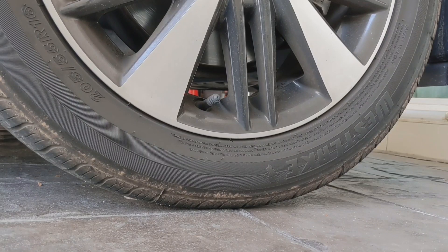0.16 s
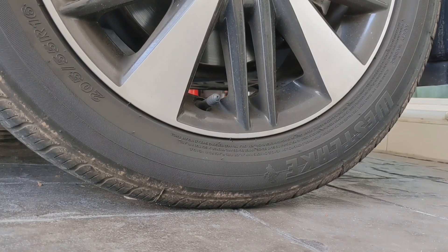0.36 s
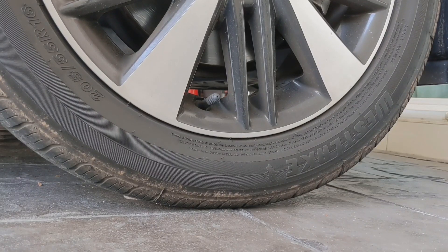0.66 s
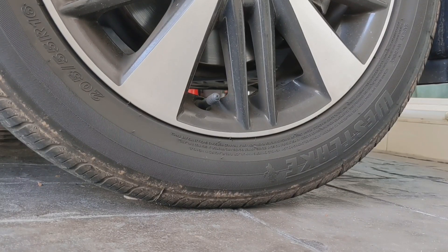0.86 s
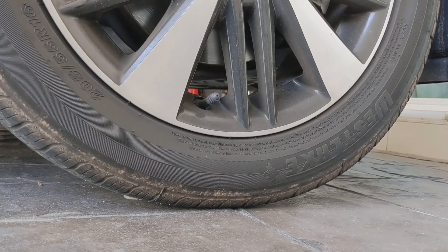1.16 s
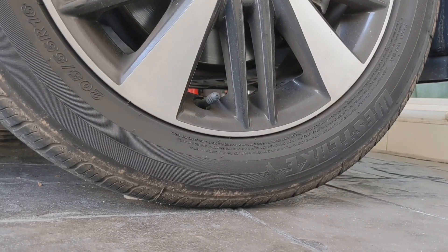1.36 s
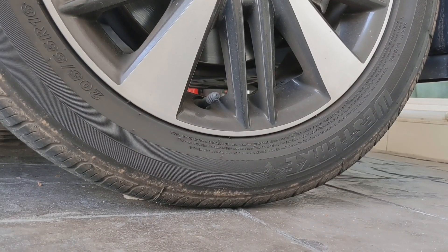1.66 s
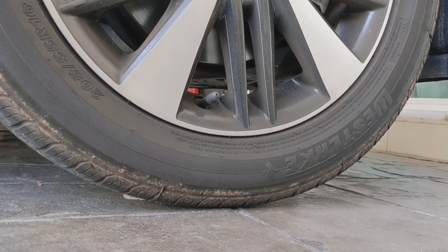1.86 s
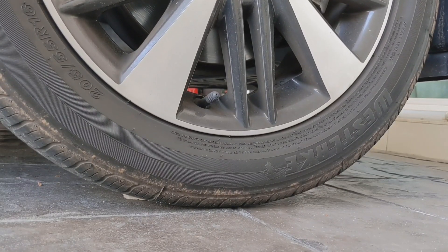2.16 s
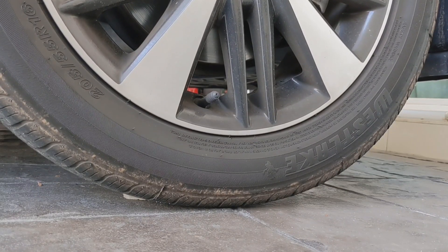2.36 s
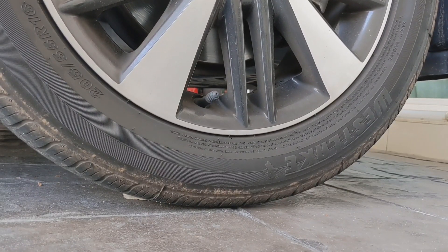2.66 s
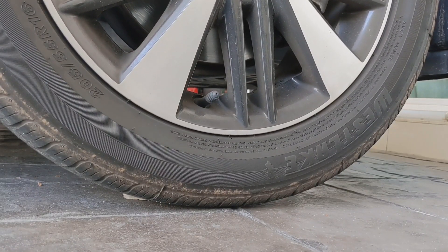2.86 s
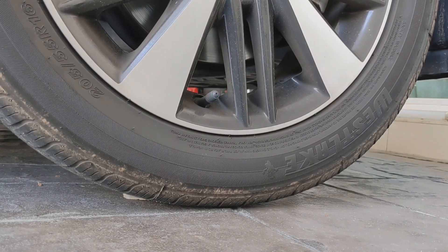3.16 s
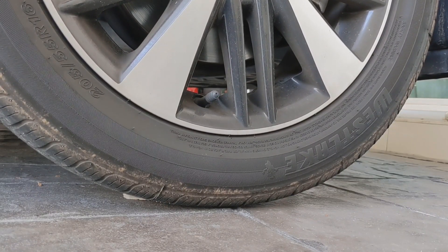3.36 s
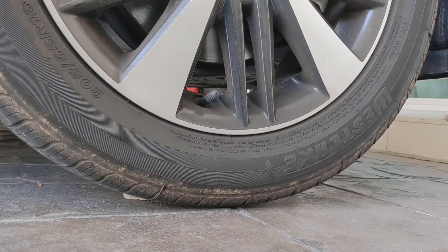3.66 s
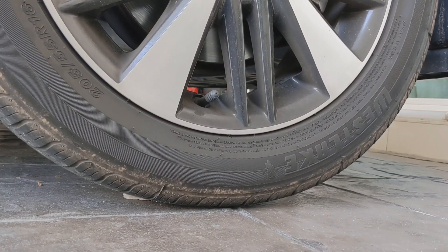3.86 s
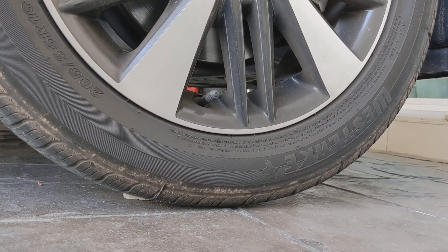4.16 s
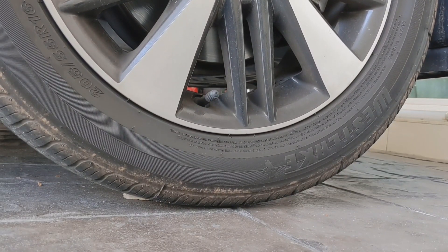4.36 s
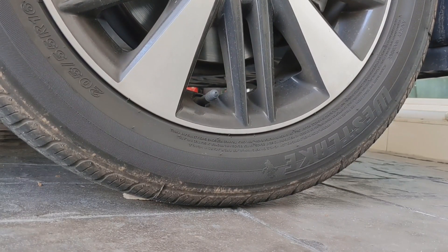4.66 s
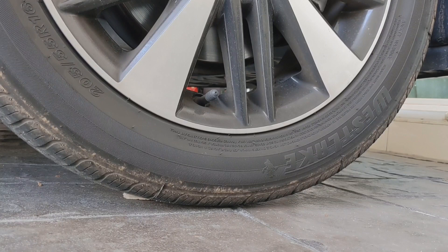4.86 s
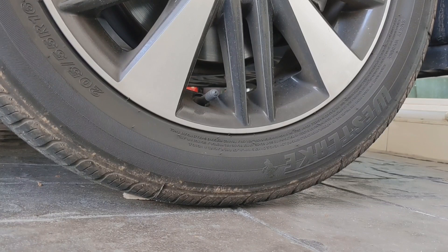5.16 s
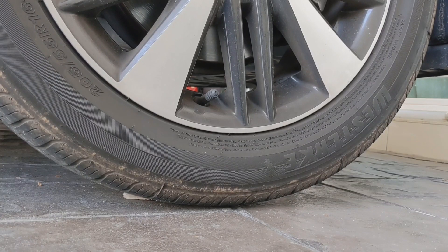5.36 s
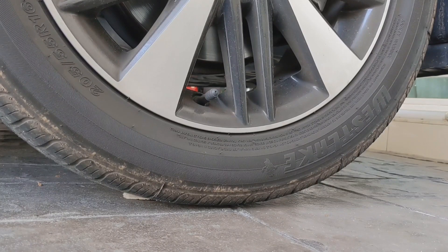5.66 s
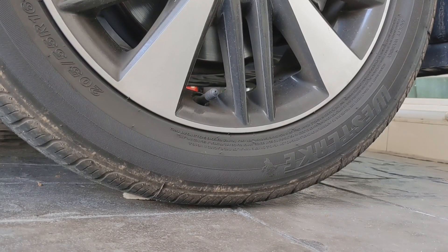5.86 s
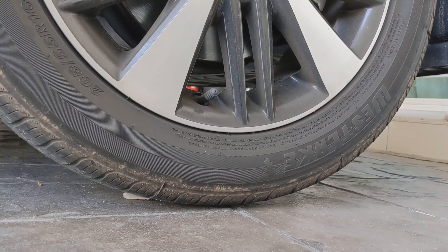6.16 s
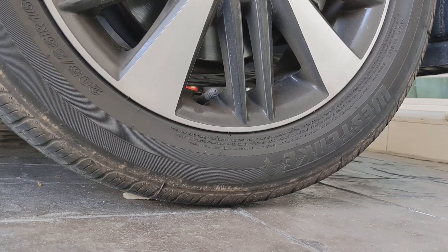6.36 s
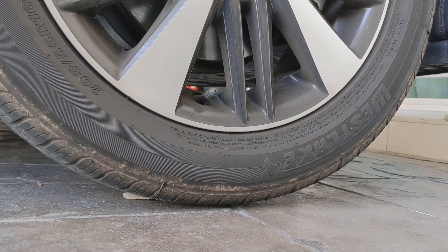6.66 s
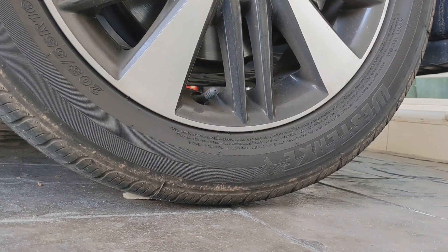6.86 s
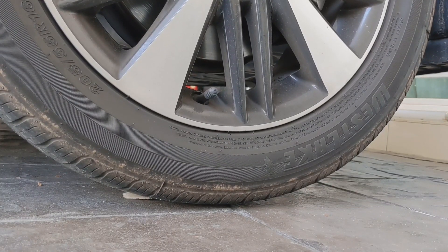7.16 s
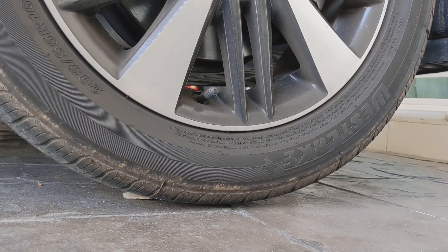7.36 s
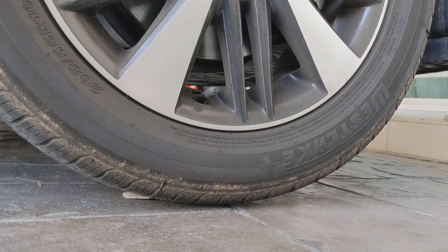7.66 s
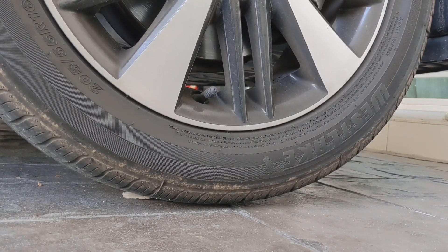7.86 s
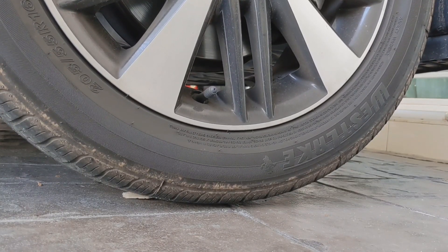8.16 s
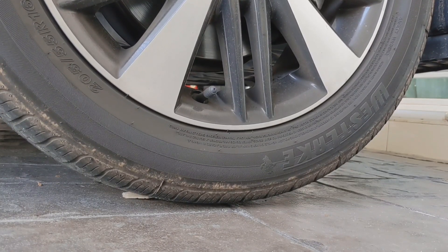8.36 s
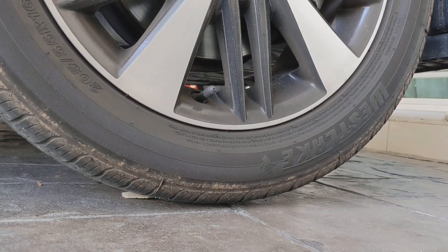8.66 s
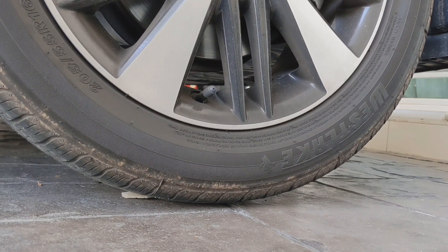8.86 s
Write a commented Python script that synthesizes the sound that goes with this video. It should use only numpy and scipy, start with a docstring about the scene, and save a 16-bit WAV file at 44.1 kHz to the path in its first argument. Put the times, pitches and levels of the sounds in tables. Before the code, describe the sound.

A hooked rod knocks unevenly in a scissor jack under a car, dry steel clacks and low shudders over soft rumble, slightly to the right.

```python
"""Outdoors on paving, close to a car: a scissor jack under it is cranked by hand with a hooked rod.
The hook knocks in the screw's eye, the loose rod clanks, the loaded body thumps: rattling noise forces drive
damped modes and noise bands. A sine groans; shaped noise makes sleeve, background rumble, mid-range wash, hiss
and a late puff of wind. The jack is to the right of a two-port microphone on a camera: the left port hears it
later and duller."""
import sys
import numpy as np
from scipy import signal
from scipy.fft import rfft, irfft, next_fast_len
from scipy.io import wavfile
from scipy.ndimage import uniform_filter1d, map_coordinates

SR = 44100
rng = np.random.default_rng(int(sys.argv[2]) if len(sys.argv) > 2 else 0)


def master(y):
    """Save y as 16-bit WAV."""
    cut = np.clip(np.atleast_2d(y).T, -1, 1)
    pcm = np.round(cut * 32767)  # scale
    wavfile.write(sys.argv[1], SR, pcm.astype(np.int16))


N = 396900

# Background rumble and mid-range wash, swelling with the after-shake of jack and car around some knocks:
# (time [s], rumble level [dB], mid-range level [dB])
BACKGROUND_LEVELS = [(0.0, -36.5, -34), (.3, -37.5, -47), (.95, -39, -38), (1.1, -41.5, -43.5),
                     (2.01, -37.5, -42), (2.8, -44, -45), (3.4, -44.5, -51), (3.99, -47.5, -47),
                     (4.26, -40.5, -45.5), (4.76, -41, -42.5), (5.1, -44.5, -49), (5.5, -42, -45.5),
                     (5.97, -41, -41.5), (6.2, -44, -48), (7.1, -43, -48), (7.84, -44.5, -47.5),
                     (8.57, -42.5, -48.5), (9.0, -42, -46.5)]
# Background rumble spectrum: (frequency [Hz], relative level [dB])
RUMBLE_SPECTRUM = [(15, -32), (25, -22), (59, -1), (81, 3), (168, -15), (250, -19.5), (320, -50),
                   (550, -120)]
# Mid-range wash spectrum: (frequency [Hz], relative level [dB])
MIDRANGE_SPECTRUM = [(88, -19), (150, 4), (303, -5.5), (350, -3.5), (770, -13), (1140, -22), (1840, -37.5),
                     (2600, -48), (3380, -55.5), (5720, -120)]
# Hiss spectrum: (frequency [Hz], relative level [dB])
HISS_SPECTRUM = [(880, -14), (1500, 5.5), (2060, 0), (3770, -7), (7840, -10.5), (15100, -16.5),
                 (16000, -21)]
# How alike spread-out noise arrives left and right: (frequency [Hz], correlation [-1 to 1])
PORT_LIKENESS = [(60, 1), (200, 0.89), (400, 0.85), (600, 0.06), (1000, 0.25), (1800, 0.045),
                 (15000, 0.037)]
# Wind buffeting spectrum: (frequency [Hz], relative level [dB])
BUFFET_SPECTRUM = [(20, -30), (60, -0.5), (100, 0.5), (150, -7), (300, -24), (600, -69.5)]
# Cloth swishing as the arm turns: (middle [s], level [dB], half length to 1/e [s])
SLEEVE_SWISHES = [(0.005, -39.5, 0.045), (0.116, -56, 0.058), (0.616, -48.5, 0.035), (1.042, -47.5, 0.035),
                  (1.303, -54.5, 0.08), (1.449, -48, 0.023), (1.76, -57, 0.056), (3.084, -46, 0.025),
                  (3.738, -52.5, 0.018), (4.17, -58, 0.044), (4.256, -54, 0.07), (4.97, -56.5, 0.044),
                  (5.53, -52.5, 0.028), (6.522, -60, 0.03), (6.677, -59, 0.065), (7.032, -56.5, 0.038),
                  (7.184, -56.5, 0.04), (7.697, -56.5, 0.04)]
# Cloth friction spectrum: (frequency [Hz], relative level [dB])
CLOTH_SPECTRUM = [(900, -12), (2000, -1), (4000, -1.5), (8000, -3.5), (13000, -10.5), (16000, -13)]

# Small dry ticks: (time [s], level [dB])
TICK_EVENTS = [(1.5528, -27.5), (1.8813, -44), (3.5237, -51), (3.8711, -55), (4.481, -36), (5.25, -49),
               (6.6238, -50.5), (8.2526, -46), (8.96, -45.5)]
# The car body settling on the jack; the first three rows (1.625, 1.845, 2.114 s) are the hook leaning in just
# before a knock: # (time [s], body [dB], arms and frame [dB], grit [dB], chatter decay [s], bloom scale [s])
THUMP_EVENTS = [(1.625, -35, -33, -34, 0.015, .01), (1.845, -30, -30, -47, 0.074, 0.015),
                (2.114, -32, -33.5, -42.5, 0.019, .018), (2.684, -31, -45, -60, 0.024, 0.0054),
                (3.102, -29.5, -39, -47.5, 0.058, .003), (4.111, -31, -38, -46.5, 0.077, .003),
                (4.269, -44, -47, -55.5, 0.044, .005), (5.425, -30, -41, -47, 0.061, .004),
                (6.538, -38, -47, -67, 0.066, .004), (6.884, -32, -40, -49, 0.028, 0.0045),
                (7.08, -34.5, -42, -55, 0.061, .006), (7.607, -29.5, -39, -44, 0.058, .003),
                (8.128, -28.5, -36.5, -42.5, 0.051, .003), (8.681, -24.5, -38.5, -43, 0.057, 0.0027)]
# Loose rod clanking: (time [s], shrill modes [dB], first mode [dB], second mode [dB],
# middle modes [dB], high modes [dB], crack [dB], bloom scale [s])
CLANK_EVENTS = [(2.837, -16, -17, -16.5, -28.5, -20.5, -14.5, 0.0038),
                (7.9636, -18.5, -21, -14, -21.5, -39, -23.5, 0.006),
                (8.5167, -20.5, -24.5, -27.5, -30, -21, -28, 0.0082)]
# Hook knocking the jack: (time [s], crack [dB], crack tilt [dB per octave], frame [dB], arms [dB],
# arms tilt [dB per octave], screw [dB], eye [dB], chatter scale [s])
KNOCK_EVENTS = [(0.2957, -19, -6, -19.5, -34, -1.5, -19.5, -20, 0.013),
                (0.4648, -14, -0.5, -21, -25, -0.5, -53, -24, .009),
                (0.7878, -14.5, -5.5, -20, -19, 4.5, -20.5, -20.5, .012),
                (0.9185, -18.5, -5, -46, -16.5, -6, -29.5, -32, .011),
                (0.9755, -21.5, -3.5, -18, -30, -2, -19.5, -24, 0.0099),
                (1.2486, -43.5, -19, -24.5, -22.5, 2.5, -23, -35.5, 0.013),
                (1.375, -26.5, -7, -15, -28, 8, -27.5, -24.5, 0.0064),
                (1.6464, -20.5, -7, -23, -23, -3.5, -24, -26, 0.012),
                (1.9078, -15.5, -3, -20.5, -23.5, -2, -45, -52.5, 0.011),
                (2.1318, -24, -7, -20, -22.5, -4.5, -29.5, -26, 0.013),
                (2.388, -8.5, 1.5, -20.5, -27, -1, -19, -36, 0.015),
                (3.6167, -26, -5.5, -21.5, -27.5, -3.5, -35.5, -42, .0086),
                (3.6834, -42, -3, -26.5, -22, -2.5, -26, -36.5, 0.015),
                (3.9395, -56, -16, -33.5, -30, 0.5, -39, -62, 0.015),
                (4.5475, -14, -6.5, -16.5, -11, -9.5, -28, -26, 0.011),
                (4.767, -24.5, -4.5, -20.5, -10.5, -9, -46, -39.5, .0065),
                (5.1804, -27.5, -9.5, -15.5, -16.5, -26, -22.5, -16.5, 0.015),
                (5.319, -21.5, -6.5, -21, -15, -10, -31.5, -35, 0.009),
                (5.765, -45, 1, -20.5, -15, -3, -27.5, -24, 0.014),
                (5.892, -15, -4, -21, -19, -2.5, -16, -28.5, 0.012),
                (6.3616, -26, -3.5, -17, -15, -3.5, -49.5, -32, .0084),
                (7.3937, -47, -6, -24, -38.5, -1, -56.5, -46, 0.012)]

# Car body, damped modes: (frequency [Hz], width [Hz], relative strength [dB])
BODY_MODES = [(119, 87, -4.5), (157.6, 8.4, 9.5), (179.9, 6.5, -1.5), (243, 38, -1)]
# Jack frame: (frequency [Hz], width [Hz], relative strength [dB])
FRAME_MODES = [(299, 33, -14), (363.6, 25.3, -2.5), (396.2, 76, -3), (434, 68, 2)]
# Jack arms: (frequency [Hz], width [Hz], relative strength [dB])
ARM_MODES = [(475, 56, -3), (567.4, 105.6, -5), (660, 102, -4), (698.6, 75, -3), (802, 67, -7.5)]
# Jack screw: (frequency [Hz], width [Hz], relative strength [dB])
SCREW_MODES = [(1050, 87, -2), (1360, 280, 5.5), (1810, 167, 5.5), (1892, 236, 5), (2550, 520, -7.5),
               (2863, 310, 2.5), (3240, 310, -14)]
# Jack pins: (frequency [Hz], width [Hz], relative strength [dB])
PIN_MODES = [(2720, 91, 9.5), (3240, 200, 0), (3970, 34, -4), (4920, 43, 8), (5400, 490, 2), (6320, 120, 8),
             (7630, 200, -4), (9160, 110, -9), (10340, 230, -26)]
# Rod, first bending mode as a close pair: (frequency [Hz], width [Hz], relative strength [dB])
ROD_FIRST_MODES = [(343, 46, 2.9), (421, 77, 0.5)]
# Rod, second bending mode as a close pair: (frequency [Hz], width [Hz], relative strength [dB])
ROD_SECOND_MODES = [(713, 103, 0), (794, 45, 9)]
# Rod, middle modes: (frequency [Hz], width [Hz], relative strength [dB])
ROD_MIDDLE_MODES = [(1040, 46, 5.5), (1440, 170, -3), (1820, 45, 5), (1893, 45, 8), (2410, 360, -10.5),
                    (2820, 150, -3.5), (3166, 490, -8)]
# Rod, high modes: (frequency [Hz], width [Hz], relative strength [dB])
ROD_HIGH_MODES = [(2920, 97, -5), (4460, 200, -6), (4350, 260, 0.5), (5400, 160, -7.5), (5740, 440, 5),
                  (6220, 160, -3.5), (7160, 170, -10.5)]
# Rod, shrill modes: (frequency [Hz], width [Hz], relative strength [dB])
ROD_SHRILL_MODES = [(7800, 200, -5), (9380, 580, -0.5), (10700, 550, -8), (12850, 920, -6.5),
                    (13460, 400, -23), (15400, 330, -11)]

# Crack of steel on steel: (frequency [Hz], relative level [dB])
CRACK_SPECTRUM = [(600, -15), (1200, -6), (2000, -8), (3000, 4), (5000, -4.5), (7000, -3.5), (10000, -4),
                  (14000, -14), (17000, -12)]
# Small dry contact: (frequency [Hz], relative level [dB])
TICK_SPECTRUM = [(1500, -40), (2600, 6.5), (4000, 0), (8000, -4), (16000, -22)]
# Grinding grit: (frequency [Hz], relative level [dB])
GRIT_SPECTRUM = [(500, -11), (900, 8.5), (1500, 1.5), (2500, -3), (5000, -15.5), (10000, -30), (16000, -31)]
# Reverberation between paving and floor pan: (frequency [Hz], decay by 60 dB [s])
UNDERSIDE_DECAY = [(100, 0.21), (300, 0.33), (700, 0.27), (2000, 0.33), (5000, 0.27), (13000, 0.21)]
# Farther port, shaded by the camera: (frequency [Hz], gain [dB])
LEFT_PORT_GAIN = [(60, -2), (300, -1), (700, -1), (2500, -3), (4500, -6.5), (6500, -4.5), (10000, -13.5),
                  (15000, -7.5)]
# The bass bends round the camera and lags less: (frequency [Hz], phase lead [radians])
LEFT_PORT_LEAD = [(60, 0.12), (200, 0.64), (350, 1), (600, 0.32), (900, .01), (16000, .01)]

HISS_DB, HISS_PER_DB = -58.5, 1  # mean hiss, and how it follows the mid-range
PUFF_S, PUFF_RISE_S, PUFF_HOLD_S, PUFF_FALL_S, PUFF_DB = 8.70, 0.046, 0.071, 0.03, -24
RUSTLE_DB, RUSTLE_SWING_DB = -65, 3.5  # faint cloth movement between the swishes
GROAN_S, GROAN_LENGTH_S, GROAN_DB, GROAN_SAG_DB_PER_S = 4.335, 0.19, -38.5, -49
CLANK_CHATTER_S, KNOCK_BLOOM_S = 0.01, 0.0037  # scales, stretched or shortened for each part
EYE_HZ, EYE_WIDTH_HZ, EYE_SAG_HZ_PER_S = 2223, 100, 20  # the screw's eye rings lower as the jack opens
BODY_SHARE_DB = -7  # the car body takes this much of what shakes the frame
AFTER_DB, AFTER_PER_DB = -7, 0.51  # after-shake of a 0 dB crack, and how it grows with the crack
LEFT_LAG_S = 20 / 44100
TOP_HZ = 15900
SPAN = SR // 3  # samples kept for each blow


def amp(db):
    """Decibels to amplitude."""
    return 10 ** (np.asarray(db) / 20)


def unit(x):
    """Scales to an rms of 1."""
    return x / np.sqrt(np.mean(np.abs(x) ** 2) + 1e-20)


def along(points, hz):
    """Reads a (frequency, value) table on a log frequency axis."""
    f, v = np.transpose(points)
    return np.interp(np.log(hz + 1), np.log(f + 1), v)


def curves(rows):
    """One value per sample for each column after the time."""
    s, *cols = np.transpose(rows)
    return [np.interp(np.arange(N) / SR, s, c) for c in cols]


def wobble(rate):
    """A smooth random curve, rate knots a second."""
    knots = rng.standard_normal(int(N * rate / SR) + 4)
    return map_coordinates(knots, [np.arange(N) * rate / SR])


def gesture(start_s, rise_s, hold_s, fall_s):
    """Rises to 1, holds, then dies away."""
    t = np.arange(N) / SR - start_s
    rise = np.clip(t / rise_s, 0, 1) ** 2
    return rise * np.exp(-np.maximum(t - rise_s - hold_s, 0) / fall_s)


def filtered(x, response):
    """Applies a complex response of frequency."""
    n = x.shape[-1]
    m = next_fast_len(n + 4096)  # silence at the end for the filter to ring into
    return irfft(rfft(x, m) * response(np.fft.rfftfreq(m, 1 / SR)), m)[..., :n]


def rush(spectrum, patchy_db):
    """Stereo noise of rms 1 with time-frequency patches of random gain."""
    z = signal.stft(rng.standard_normal((2, N)), nperseg=512)[2]
    field = uniform_filter1d(rng.standard_normal(z.shape[1:]), size=5, axis=0)
    field = uniform_filter1d(field, size=8, axis=1)
    pair = signal.istft(z * amp(patchy_db * unit(field)), nperseg=512)[1][:, :N]

    def mid_side(hz):
        # splitting power between mid and side sets how alike the ports are
        turn = np.arccos(np.clip(along(PORT_LIKENESS, hz), -1, 1)) / 2
        return amp(along(spectrum, hz)) * [np.cos(turn), np.sin(turn)]

    mid, side = filtered(pair, mid_side)
    return unit(np.array([mid + side, mid - side]))


def chatter(length_s, bloom_s, after_db, after_s=0.038):
    """Loose steel meets repeatedly: a rattling force swells, dies and shakes on weakly. One row per port."""
    t = np.arange(SPAN) / SR
    swell = (1 - np.exp(-t / max(0.65 * bloom_s, 0.0003))) ** 2
    decay = np.exp(-t / max(length_s, 0.001)) + amp(after_db) * np.exp(-t / after_s)
    shape = swell * decay
    shared, own = rng.standard_normal(SPAN), rng.standard_normal((2, SPAN))
    lumps = np.interp(t * 250, np.arange(200), rng.standard_normal(200))  # 250 knots a second
    return shape / shape.max() * amp(3.23 * lumps) * (1.15 * shared + 0.7 * own)


def modes_of(modes, db, scatter_db=2.5):
    """Response of damped modes, each at a new strength; its rms over frequency is the level db."""
    modes = np.array(modes) + np.outer(rng.standard_normal(len(modes)), [0, 0, scatter_db])

    def answer(f):
        total = 0
        for k, (center, width, gain_db) in enumerate(modes):
            resonance = 1j * f * width / (center * center - f * f + 1j * f * width)
            total = total + (-1) ** k * amp(gain_db) * resonance  # neighbours in opposite sign
        return total

    return lambda f: amp(db) * unit(answer(f))


def blend_of(spectrum, db, tilt_db=0.6):
    """Response of countless short modes that blend into noise; a higher tilt, as of a harder contact, is brighter."""
    def response(hz):
        tilt = tilt_db * np.log2(np.maximum(hz, 1500) / 5000)
        return amp(db + tilt) * unit(amp(along(spectrum, hz)))
    return response


def tilted(response, tilt_db, pivot_hz=600):
    """Where the blow lands favours the lower or the upper modes."""
    return lambda hz: response(hz) * amp(tilt_db * np.log2(np.clip(hz / pivot_hz, 0.7, 1.4)))


def ring(force, *parts):
    """One force drives several parts at once."""
    return filtered(force, lambda hz: sum(part(hz) for part in parts))


def under_car(x, wet_db):
    """Direct sound plus the answer of paving and floor pan, new for each blow and port."""
    hz, t, z = signal.stft(rng.standard_normal((2, SPAN)), SR, nperseg=256)
    decay = amp(-60 * t / along(UNDERSIDE_DECAY, hz)[:, None])
    tail = signal.istft(z * decay, SR, nperseg=256)[1][:, :SPAN]
    delayed = np.pad(x, ((0, 0), (130, 0)))  # samples
    wet = signal.fftconvolve(delayed, tail / np.linalg.norm(tail[0]), axes=1)[:, :SPAN]
    return x + amp(wet_db) * wet


def add(out, s, x):
    """Puts a sound at time s."""
    out[:, round(s * SR):][:, :SPAN] += x


def air():
    """Background of filtered noise: rumble and mid-range wash, swelling around some knocks, and hiss."""
    rumble_db, midrange_db = curves(BACKGROUND_LEVELS)
    hiss_db = HISS_DB + HISS_PER_DB * (midrange_db - midrange_db.mean())
    rumble = amp(rumble_db + 1.17 * wobble(24)) * rush(RUMBLE_SPECTRUM, patchy_db=2.5)
    midrange = amp(midrange_db + 2.5 * wobble(9)) * rush(MIDRANGE_SPECTRUM, patchy_db=2.5)
    hiss = amp(hiss_db + 0.55 * wobble(10)) * rush(HISS_SPECTRUM, patchy_db=3.5)
    return rumble + midrange + hiss


def wind():
    """A puff of low noise buffets the right port and reaches the left more weakly."""
    noise = rng.standard_normal((2, N))
    buffet = unit(filtered(noise, lambda hz: amp(along(BUFFET_SPECTRUM, hz))))
    level_db = PUFF_DB + np.array([[-10], [0]]) + 3.5 * wobble(30)
    return amp(level_db) * buffet * gesture(PUFF_S, PUFF_RISE_S, PUFF_HOLD_S, PUFF_FALL_S)


def sleeve():
    """Each swish is a soft swell of grainy friction, over a faint rustle."""
    t = np.arange(0, N, 32) / SR  # coarse grid, enough for slow swells
    swell = sum(amp(db) * np.exp(-((t - s) / half_s) ** 2) for s, db, half_s in SLEEVE_SWISHES)
    rustle = amp(RUSTLE_DB + RUSTLE_SWING_DB * wobble(4))
    level = np.interp(np.arange(N) / SR, t, swell) + rustle
    return level * amp(0.83 * wobble(120)) * rush(CLOTH_SPECTRUM, patchy_db=2.5)


def groan():
    """Friction keeps the frame's main mode humming for a moment: a wavering sine that sags in level."""
    cycles = np.cumsum(445 + 12 * wobble(26)) / SR  # Hz, wandering
    sag_db = GROAN_SAG_DB_PER_S * np.clip(np.arange(N) / SR - GROAN_S, 0, 1)
    level = amp(GROAN_DB + sag_db + 1.7 * wobble(24.85))
    return level * gesture(GROAN_S, 0.0074, GROAN_LENGTH_S, 0.015) * np.sin(2 * np.pi * cycles)


def ticks():
    """Tiny, very short contacts that reach only the treble."""
    out = np.zeros((2, N + SR))
    for s, db in TICK_EVENTS:
        force = chatter(0.0018, 0.00046, after_db=-38.0, after_s=0.011)
        add(out, s, under_car(ring(force, blend_of(TICK_SPECTRUM, db)), wet_db=-8.0))
    return out[:, :N]


def body():
    """Dull shudders as the load shifts, and the hook leaning in just before some knocks, with grit grinding
    under the jack's foot."""
    out = np.zeros((2, N + SR))
    for s, body_db, arms_db, grit_db, length_s, bloom_s in THUMP_EVENTS:
        force = chatter(length_s, bloom_s, after_db=-20)
        shake = ring(force,
                     modes_of(BODY_MODES, body_db),
                     modes_of(FRAME_MODES + ARM_MODES, arms_db),
                     blend_of(GRIT_SPECTRUM, grit_db))
        add(out, s, under_car(shake, wet_db=-9.0))
    return out[:, :N]


def rod():
    """The free rod rings at its bending modes; the low ones build up over a longer contact."""
    out = np.zeros((2, N + SR))
    for s, shrill_db, first_db, second_db, middle_db, high_db, crack_db, bloom_s in CLANK_EVENTS:
        lean = chatter(1.64 * CLANK_CHATTER_S, bloom_s, after_db=-25, after_s=0.068)
        snap = chatter(0.4 * CLANK_CHATTER_S, 0.00077, after_db=-34)
        crash = chatter(0.59 * CLANK_CHATTER_S, 0.00052, after_db=-22.5)
        tone = ring(lean,
                    modes_of(ROD_FIRST_MODES, first_db),
                    modes_of(ROD_SECOND_MODES, second_db),
                    modes_of(ROD_MIDDLE_MODES, middle_db),
                    blend_of(GRIT_SPECTRUM, crack_db - 16),
                    modes_of(BODY_MODES, first_db - 11.5))
        shrill = ring(snap, modes_of(ROD_SHRILL_MODES, shrill_db))
        bright = ring(crash,
                      modes_of(ROD_HIGH_MODES, high_db, scatter_db=3.0),
                      blend_of(CRACK_SPECTRUM, crack_db))
        add(out, s, under_car(tone + shrill + bright, wet_db=-13.0))
    return out[:, :N]


def hook():
    """Each knock shakes car body, frame, arms, screw and eye in its own shares; heavy parts are slower and longer."""
    out = np.zeros((2, N + SR))
    for (s, crack_db, tilt_db, frame_db, arms_db, arms_tilt_db,
         screw_db, eye_db, length_s) in KNOCK_EVENTS:
        after_db = AFTER_DB + AFTER_PER_DB * crack_db
        heavy = chatter(1.34 * length_s, KNOCK_BLOOM_S, after_db, after_s=0.058)
        light = chatter(0.46 * length_s, 0.38 * KNOCK_BLOOM_S, after_db - 12.5)
        eye = [(EYE_HZ - EYE_SAG_HZ_PER_S * s, EYE_WIDTH_HZ, 0)]
        low = ring(heavy,
                   modes_of(BODY_MODES, frame_db + BODY_SHARE_DB),
                   modes_of(FRAME_MODES, frame_db),
                   tilted(modes_of(ARM_MODES, arms_db), arms_tilt_db))
        high = ring(light,
                    modes_of(SCREW_MODES, screw_db),
                    modes_of(eye, eye_db),
                    modes_of(PIN_MODES, crack_db - 10.5, scatter_db=7.5),
                    blend_of(CRACK_SPECTRUM, crack_db - 3.5, tilt_db),
                    blend_of(GRIT_SPECTRUM, arms_db - 11.5))
        add(out, s, under_car(low + high, wet_db=-9))
    return out[:, :N]


def scene():
    """All sources at the two ports, left then right."""
    background = air() + wind() + sleeve()
    # the near jack is shaded more than the diffuse background
    jack = amp([[-3.5], [-1.5]]) * (ticks() + body() + rod() + hook())
    return background + groan() + jack


def record(dry):
    """Two-port microphone: farther, shaded left port; deep bass cut, loud peaks rounded, then a band limit."""
    def left(hz):
        phase = along(LEFT_PORT_LEAD, hz) - 2 * np.pi * hz * LEFT_LAG_S
        return amp(along(LEFT_PORT_GAIN, hz)) * np.exp(1j * phase)

    def microphone(hz):
        bass_cut = (1j * hz / (45 + 1j * hz)) ** 2
        return np.array([left(hz), np.ones_like(hz)]) * bass_cut

    ports = filtered(dry, microphone)
    rounded = ports / (1 + np.abs(ports / 0.93) ** 6) ** (1 / 6)
    return filtered(rounded, lambda hz: hz < TOP_HZ)


dry = scene()
out = record(dry)
master(out)
```